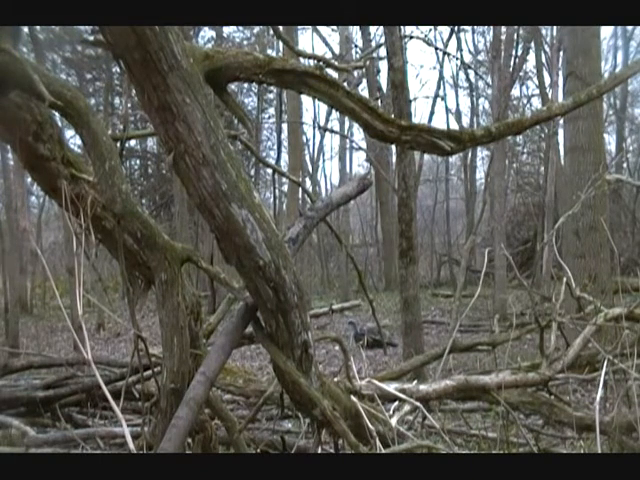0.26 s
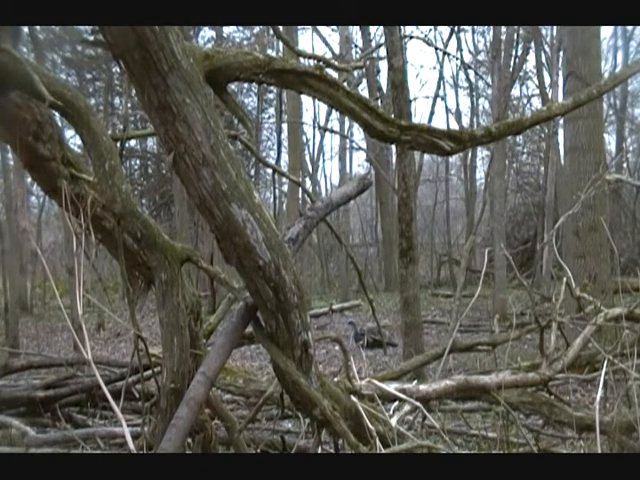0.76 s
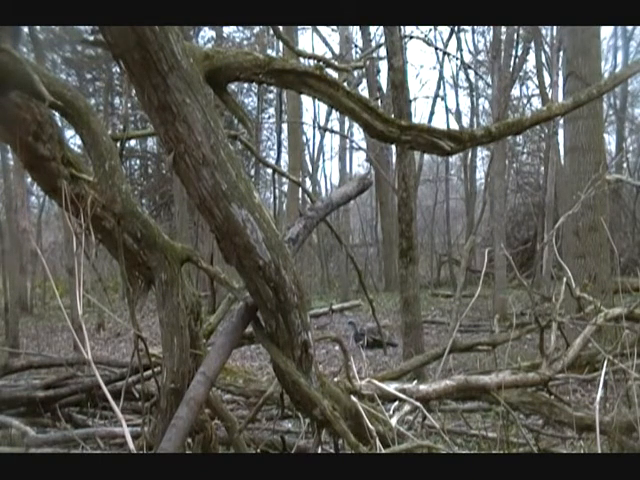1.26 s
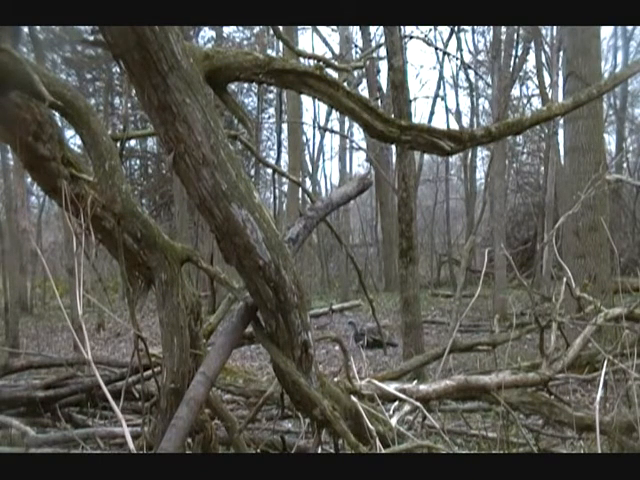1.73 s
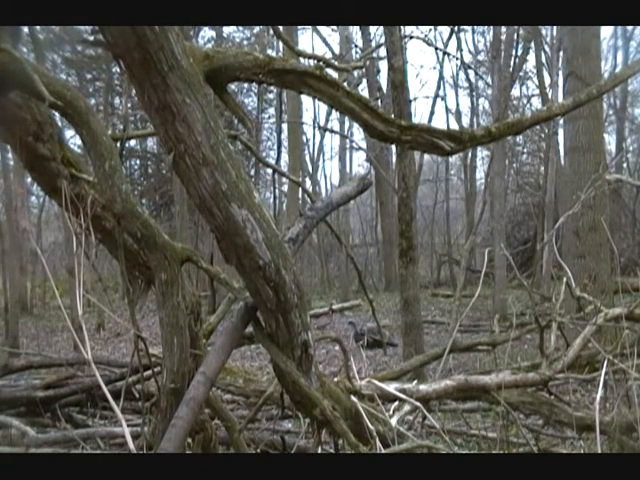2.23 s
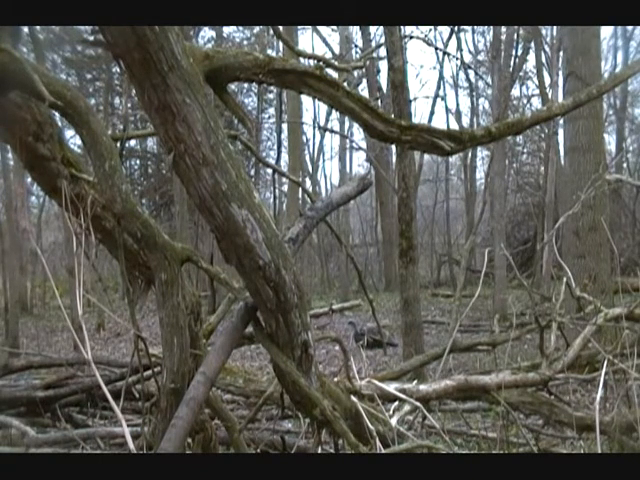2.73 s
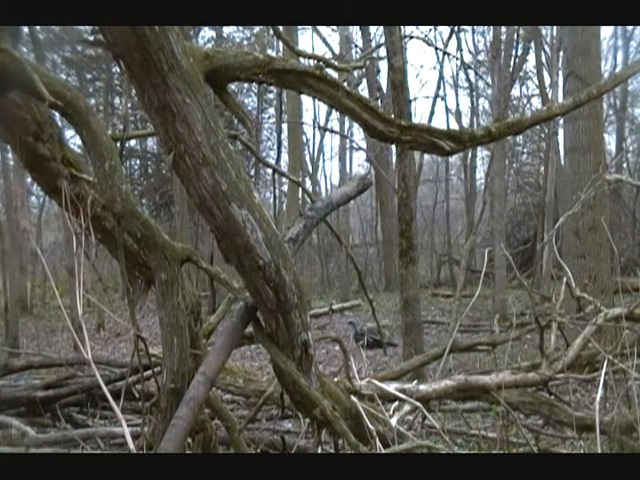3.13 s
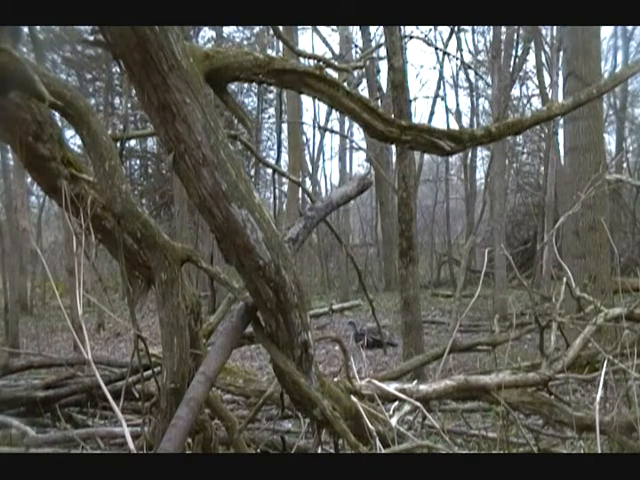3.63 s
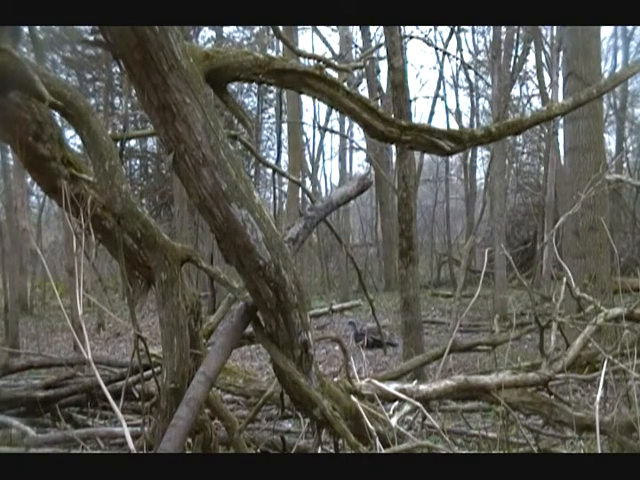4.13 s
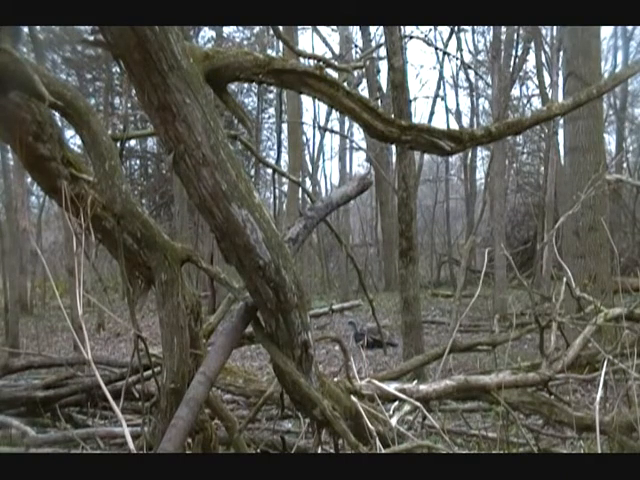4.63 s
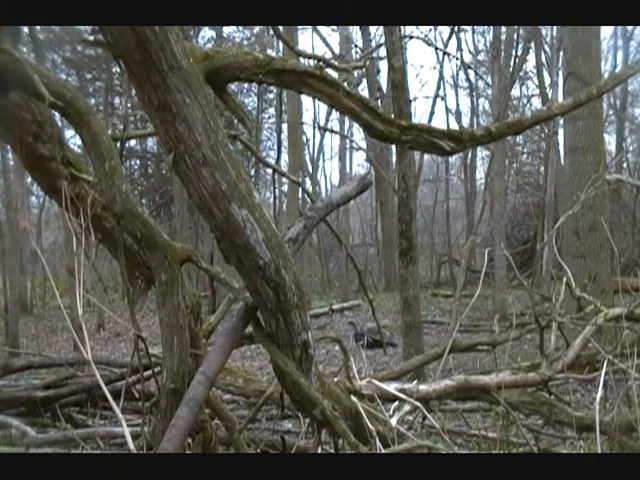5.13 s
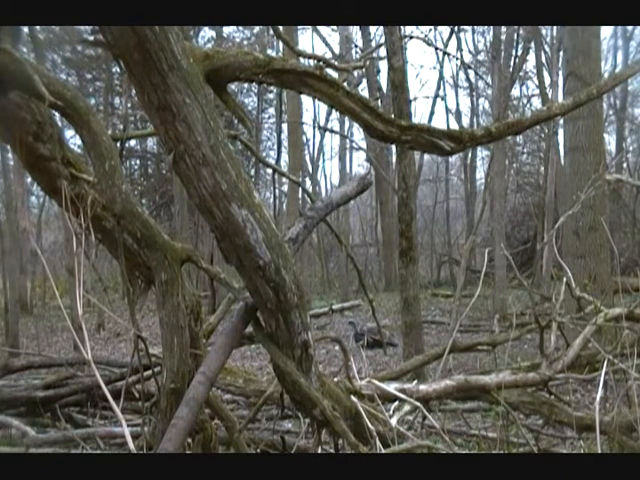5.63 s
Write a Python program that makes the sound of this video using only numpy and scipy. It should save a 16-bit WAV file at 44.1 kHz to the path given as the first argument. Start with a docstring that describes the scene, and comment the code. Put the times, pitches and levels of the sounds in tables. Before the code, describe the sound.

Wild turkeys cluck a few metres from the microphone in bare woods, in short, sharp single and double notes spaced irregularly. After nearly four seconds the clucks give way to soft murmuring pips and a faint crackle of dry leaves. Songbirds further off twitter, chip and whistle in falling glides, and a brief harsh squawk comes near the end. Distant engines drone under a steady low rumble and light hiss.

```python
"""Wild turkeys cluck a few metres away in bare spring woods, pulses from the syrinx resonating in throat
and beak; between clucks they murmur softly and leaves crackle underfoot. Further off, songbirds twitter,
chip and whistle in gliding tones, and a harsh voice squawks. Twigs and trunks scatter the calls into
reverberation. Distant engines drone at their firing tones under a steady rumble and the hiss of the air."""
import sys
import numpy as np
from scipy import signal
from scipy.fft import rfft, irfft
from scipy.io import wavfile
from scipy.ndimage import map_coordinates

SR = 44100
rng = np.random.default_rng(int(sys.argv[2]) if len(sys.argv) > 2 else 0)


def wav_out(sig):
    """Save sig, one row per channel (or a flat mono array), as 16-bit PCM at SR to the path in sys.argv[1]."""
    wavfile.write(sys.argv[1], SR, np.round(np.clip(np.atleast_2d(sig).T, -1, 1) * 32767).astype(np.int16))


N = 258867
TIME = np.arange(N) / SR


def clucks(attack_s=0.0076, release_s=0.0083, drop_s=0.01292, sag_db_per_s=126, jitter=0.037):
    """Source and filter: throat and beak shape the syrinx pulses; a second voice rings beside them."""
    # clucks: t/s, duration/s, f/Hz, relative level/dB, overtones re fundamental/dB
    calls = [(.004, 0.024, 1042, -34.5, -3.5), (0.089, 0.019, 1024, -33, -5.5),
             (.508, 0.023, 978, -26.5, 1), (.666, 0.024, 1008, -25.5, -1), (1.082, .02, 1130, -30, -0.5),
             (1.113, 0.016, 1056, -35.5, -4), (1.202, .021, 984, -30.5, -2.5),
             (1.214, 0.035, 915.3, -26.5, 1), (1.765, 0.02, 1160, -38.5, -10),
             (1.791, 0.026, 1052, -25.5, 0.5), (2.388, .024, 1058, -24, 1), (2.443, 0.023, 1006, -21, 1.5),
             (3.073, .031, 1112, -23.5, 2), (3.646, 0.017, 853, -25.5, 2), (3.649, .046, 766, -21.5, -8.5)]
    # response of throat and beak: f/Hz, gain/dB
    throat = [(400, -18.5), (750, -6), (1020, 0.5), (1250, -1.5), (1480, -7.5), (1830, 2), (2120, -0.5),
              (2550, -5.5), (3050, -5.5), (3600, -16), (4800, -19.5), (6100, -27), (7500, -39),
              (10500, -42.5)]
    # the second voice breaking through: t/s, duration/s, relative level/dB
    squeaks = [(1.219, .015, -27), (1.2292, 0.015, -17.5), (1.798, 0.017, -27.5), (3.647, 0.013, -17),
               (3.653, 0.029, -26.5), (3.685, 0.017, -29.5)]
    second_hz, second_db, waver, rasp_db = 1763, -9, 0.011, -19
    pulses, second_voice = np.zeros(N), np.zeros(N)
    for s, length, hz, db, overtones_db in calls:
        t = TIME[:int(length * SR)]
        # a cluck starts sharp, drops onto its pitch and lifts again as it ends
        drop = 0.26 * (1 - t / drop_s).clip(0) ** 2
        lift = 0.16 * (t / length) ** 4.7
        phase = turn(hz * (1 + drop + lift) * (1 + jitter * walk(982, len(t))))
        attack = (t / attack_s).clip(0, 1)
        release = ((length - t) / release_s).clip(0, 1)
        swell = attack * release * undb(-sag_db_per_s * (t - attack_s))
        buzz = sum(np.cos(k * phase) for k in range(2, 11))
        rasp = undb(rasp_db) * 4 * walk(20000, len(t)) * (1 + np.cos(phase))
        # the tone starts pure and gains its overtones once the membranes slap together
        slap = undb(overtones_db) * attack ** 3.6 * release ** 0.13
        add(pulses, s, undb(db) * swell * (np.cos(phase) + slap * buzz + rasp))
        add(second_voice, s, undb(db + second_db) * pip(length, second_hz, waver))
    for s, length, db in squeaks:
        add(second_voice, s, undb(db) * pip(length, second_hz, waver))
    return undb(3) * (colour(pulses, throat) + second_voice)


def murmurs(pip_s=0.021, spacing_s=0.019, hz=1770, uneven_db=2.5):
    """Tone bursts: with the beak shut, only a turkey's second voice sounds, in soft pips."""
    # runs of pips: t/s, duration/s, level/dB
    runs = [(0.386, .02, -46), (4.709, .02, -47.5), (4.831, .02, -47.5), (4.899, .04, -44.5),
            (4.982, .125, -42), (5.434, .02, -48), (5.516, .02, -53)]
    out = np.zeros(N)
    for s, length, db in runs:
        for delay in np.arange(0, length, spacing_s):
            gain = undb(db + uneven_db * rng.standard_normal())
            add(out, s + delay, gain * pip(pip_s, hz, waver=0.043))
    return out


def rustles(crackle_db=6):
    """Amplitude-modulated noise: dry leaves crackle briefly under a foot."""
    # steps in the leaf litter: t/s, duration/s, level/dB
    steps = [(0.912, 0.058, -49), (4.402, 0.125, -47), (4.466, 0.018, -59)]
    # spectrum of dry leaves: f/Hz, gain/dB
    leaves = [(300, -15), (1200, -6), (1600, -4), (2800, -1), (4000, -8.5), (5500, -8.5), (11000, -43)]
    press = np.zeros(N)
    for s, length, db in steps:
        add(press, s, undb(db) * np.hanning(int(length * SR)))
    crackle = rng.standard_normal(N) * undb(crackle_db * walk(500))
    return press * unit(colour(crackle, leaves))


def whistles(waver=0.0045, tremble_db=1.6, gain_db=-2.5):
    """Pure-tone glides: three thin, trembling bird whistles slide slowly down."""
    # one contour for each whistle: t/s, f/Hz, relative level/dB
    contours = [
        [(0.0, 4470, -53), (0.12, 4039.0, -56), (0.26, 3380, -54), (0.5, 2990, -54.4), (0.63, 2661.0, -53.3),
         (0.8, 2410, -58)],
        [(2.34, 3920, -55), (2.42, 4460, -47), (2.56, 4620, -52.5), (2.68, 4065, -48), (2.8, 3830, -57)],
        [(2.82, 3462, -51), (2.92, 3280, -44), (3.02, 3220, -55.5), (3.14, 3023, -42), (3.3, 2764, -49.5),
         (3.5, 2491, -50.5), (3.65, 2253, -60)],
    ]
    out = np.zeros(N)
    for rows in contours:
        hz, db = curve(rows)
        sounding = (TIME >= rows[0][0]) & (TIME < rows[-1][0])
        envelope = sounding * undb(db + gain_db + tremble_db * walk(60))
        out += envelope * np.sin(turn(hz * (1 + waver * walk(150))))
    return out


def chips(length_s=0.018, sweep=0.28, jitter=0.043, gain_db=-2):
    """Frequency sweeps: a nearby bird's upward flicks, made scratchy by pitch jitter."""
    # dry chips: t/s, relative peak level/dB, centre f/Hz
    calls = [(0.5803, -40, 2970), (1.4803, -43, 2790), (4.0056, -34.5, 2980), (4.63, -44.5, 2980),
             (5.1838, -42, 3080)]
    out = np.zeros(N)
    for s, db, hz in calls:
        ramp = np.linspace(-0.5, 0.5, int(length_s * SR))
        pitch = hz * (1 + sweep * ramp + jitter * walk(1580, len(ramp)))
        add(out, s - length_s / 4, undb(db + gain_db) * np.hanning(len(ramp)) * np.sin(turn(pitch)))
    return out


def twitters(lead_s=0.026, lead_db=-2.5, stroke_s=0.023, fade_db_per_s=22):
    """Linear chirps: a songbird's high lead note, then up-down flicks that fade as they repeat."""
    # twitters: t/s, duration/s, flick period/s, level/dB
    phrases = [(0.004, .2, 0.13, -47), (1.863, .34, 0.12, -44.5), (4.093, .14, .08, -44)]
    lead_hz = np.linspace(4230, 4630, int(lead_s * SR))
    up_hz = np.linspace(2800, 3368, int(stroke_s * SR))
    down_hz = np.linspace(3368, 2320, int(stroke_s * SR))
    out = np.zeros(N)
    for s, length, period, db in phrases:
        add(out, s, undb(db + lead_db) * note(lead_hz, hoarse=0.2))
        for delay in np.arange(0, length, period):
            flick = np.concatenate([note(up_hz, hoarse=0.45), note(down_hz, hoarse=0.45)])
            add(out, s + lead_s + delay, undb(db - fade_db_per_s * delay) * flick)
    return out


def songbirds(rise_octaves_per_s=1.01, settle_s=0.024, fade_db_per_s=14, hoarse=0.13):
    """Exponential glides: high notes climb at one rate; slurs settle onto a pitch and fade."""
    # rising notes: t/s, duration/s, middle f/Hz, level/dB
    rising_notes = [(0.137, 0.018, 4850, -48.5), (1.525, 0.13, 6600, -58.5), (3.206, 0.14, 6320, -45),
                    (3.322, .025, 7720, -41.5), (3.337, 0.038, 8220, -38), (3.377, 0.021, 8930, -41.5),
                    (5.636, 0.065, 8600, -47), (5.768, 0.046, 6240, -47), (5.843, 0.035, 8450, -47)]
    # falling slurs: t/s, duration/s, landing f/Hz, level/dB
    slurs = [(4.68, .1, 4270, -58), (4.713, 0.12, 5245, -49), (4.832, 0.042, 3980, -45),
             (4.871, 0.28, 3216, -45.5), (5.275, 0.091, 5780, -56.5), (5.371, 0.044, 5000, -56)]
    out = np.zeros(N)
    for s, length, hz, db in rising_notes:
        t = TIME[:int(length * SR)]
        pitch = hz * 2 ** (rise_octaves_per_s * (t - length / 2))
        add(out, s, undb(db) * note(pitch, hoarse))
    for s, length, hz, db in slurs:
        t = TIME[:int(length * SR)]
        pitch = hz * (1 + 0.145 * np.exp(-t / settle_s))
        add(out, s, undb(db - fade_db_per_s * t) * note(pitch, hoarse))
    return out


def squawk(rattle_hz=48, jitter=0.1314):
    """Spectral broadening: a rising, rattling voice is so unsteady that its harmonics smear."""
    # course of the far-off call: t/s, f/Hz, level/dB
    contour = [(5.57, 1050, -65.5), (5.595, 1079, -46.5), (5.612, 1112, -40.5), (5.65, 1239, -45),
               (5.675, 1274, -54), (5.72, 1270, -74)]
    # timbre of the voice: f/Hz, gain/dB
    timbre = [(400, -34), (1200, -16), (1600, 2), (2200, 1), (2600, 1.5), (3100, -15), (3800, -17),
              (5500, -18), (10000, -42)]
    hz, db = curve(contour)
    phase = turn(hz * (1 + jitter * walk(1600)))
    harmonics = sum(np.cos(k * phase) for k in range(1, 6))
    rattle = 1 + 0.5 * np.sin(turn(rattle_hz * (1 + 0.15 * walk(30))))
    sounding = (TIME > contour[0][0]) & (TIME < contour[-1][0])
    return unit(colour(harmonics, timbre)) * rattle * undb(db) * sounding


def engines(fast_hz=77.3, slow_hz=68.6, overtone_hz=155):
    """Beating of two distant engines: only the lowest firing tones carry; the air makes them waver."""
    # the faster engine: t/s, relative level/dB
    fast_levels = [(0, -43.9), (0.5, -51.1), (0.85, -40.8), (1.72, -48.6), (1.79, -32.9), (2.2, -35.5),
                   (2.33, -52.0), (2.65, -37.1), (2.9, -53.4), (3.15, -43.6), (4.2, -40.0), (4.8, -42.9),
                   (5.4, -40.3), (5.87, -48.3)]
    # the slower engine: t/s, level/dB
    slow_levels = [(0, -44), (.4, -56), (3.6, -54), (4.2, -46), (4.8, -40), (5.4, -42), (5.87, -53)]
    fast_db, = curve(fast_levels)
    slow_db, = curve(slow_levels)
    fast = undb(fast_db + 1 + 2 * walk(15)) * np.sin(turn(fast_hz + 1.11 * walk(2.063)))
    slow = undb(slow_db + walk(12)) * np.sin(turn(slow_hz + walk(2.1)))
    overtone = undb(-53 + 2 * walk(3.5)) * np.sin(turn(overtone_hz + walk(3)))
    return fast + slow + overtone


def air(level_db=-39, swell_db=0.06, flicker_db=0.5):
    """Partly coherent noise: far rumble and hiss in octave bands that swell together and flicker alone."""
    # background spectrum: f/Hz, relative spectral density/dB
    spectrum = [(18, -12.5), (28, -11.2), (45, -3.7), (65, 0.0), (125, -4.0), (190, -11.7), (300, -18.0),
                (560, -21.3), (900, -24.8), (1800, -29.3), (2900, -32.7), (4200, -36.0), (6500, -38.4),
                (11000, -41.0)]
    # likeness of left and right: f/Hz, correlation (0-1)
    likeness = [(60, 1), (130, 0.98), (270, 0.86), (570, 0.73), (1220, 0.56), (2580, 0.24), (5500, 0.03)]
    hz = np.fft.rfftfreq(N, 1 / SR)
    correlation = np.clip(at(likeness, hz), 0, 1)
    width = np.sqrt((1 - correlation) / (1 + correlation))
    mid, side = rfft(rng.standard_normal((2, N))) * undb(at(spectrum, hz))
    stereo = mid + np.array([[1], [-1]]) * side * width
    octave = np.log2(np.maximum(hz, 32)).astype(int)
    common_db = swell_db * walk(1.5)
    out = np.zeros((2, N))
    for k in np.unique(octave):
        out += irfft(stereo * (octave == k), N) * undb(common_db + flicker_db * walk(6.8))
    return undb(level_db) * unit(out)


def woods(x, left_lag_ms, trunks_db, twigs_db, t60_s=0.99, treble_t60_s=0.43):
    """Multiple scattering: after the direct sound, twigs echo briefly and trunks for longer."""
    hz = np.fft.rfftfreq(N, 1 / SR)
    left = irfft(rfft(x) * np.exp(-2j * np.pi * hz * left_lag_ms / 1000), N)
    t = TIME[:SR]
    shared, own = rng.standard_normal(SR), rng.standard_normal((2, SR))
    diffuse = own + 0.57 * shared
    # the air absorbs the treble along the longer paths
    low = signal.sosfiltfilt(signal.butter(2, 5500, fs=SR, output="sos"), diffuse)
    tail = low * undb(-60 * t / t60_s) + (diffuse - low) * undb(-60 * t / treble_t60_s)
    trunks = unit(tail * (1 - np.exp(-t / 0.019)))
    twigs = unit((own + shared)[:, ::-1] * np.exp(-t / 0.012) * (1 - np.exp(-t / 0.00052)))
    echoes = (undb(trunks_db) * trunks + undb(twigs_db) * twigs) / np.sqrt(SR)
    return np.array([left, x]) + signal.fftconvolve(x[None], echoes, axes=1)[:, :N]


def pip(length_s, hz, waver):
    """Tone burst: one smooth swell of a wavering sine."""
    swell = np.hanning(int(length_s * SR))
    return swell * np.sin(turn(hz * (1 + waver * walk(340, len(swell)))))


def note(hz, hoarse, flutter_db=1.6):
    """Random modulation: a songbird's note flutters in level and, if hoarse (0-1), shakes in pitch."""
    size = len(hz)
    shake = (0.0035 + 0.16 * hoarse ** 2) * walk(893, size)
    swell = np.sqrt(np.sin(np.linspace(0, np.pi, size)).clip(0))
    return undb(flutter_db * walk(135, size)) * swell * np.sin(turn(hz * (1 + shake)))


def colour(x, points):
    """Minimum-phase filtering with the response given as f/Hz, gain/dB."""
    size = 2048
    gain = undb(at(points, np.fft.rfftfreq(size, 1 / SR)))
    cepstrum = irfft(np.log(gain))
    cepstrum[1:size // 2] *= 2
    cepstrum[size // 2 + 1:] = 0
    return signal.fftconvolve(x, irfft(np.exp(rfft(cepstrum))))[:N]


def walk(rate, size=N):
    """Smooth random fluctuation with spread near 1, changing rate times a second."""
    source = np.random.default_rng(rng.integers(2 ** 31))
    steps = source.standard_normal(int(size * rate / SR) + 4)
    return map_coordinates(steps, [np.arange(size) * rate / SR + 1], order=2)


def turn(hz):
    """Phase as the time integral of frequency."""
    return 2 * np.pi * np.cumsum(hz) / SR


def curve(rows):
    """Linear interpolation in time of each column of a table."""
    s, *columns = np.transpose(rows)
    return [np.interp(TIME, s, column) for column in columns]


def at(points, hz):
    """Interpolation of (f/Hz, value) points on a log-frequency axis."""
    f, value = np.transpose(points)
    return np.interp(np.log(np.maximum(hz, 1)), np.log(f), value)


def add(track, s, x):
    """Superposition of a sound on a track at time s."""
    i = max(int(s * SR), 0)
    track[i:i + len(x)] += x[:max(N - i, 0)]


def undb(db):
    """Amplitude ratio from decibels."""
    return 10 ** (np.asarray(db) / 20)


def unit(x):
    """Normalisation to rms 1."""
    return x / np.sqrt(np.mean(x ** 2))


def balance(left_db):
    """Level difference: stereo gains that put the left side left_db above the right."""
    return undb(np.array([[left_db], [-left_db]]) / 2)


def scene():
    """Superposition: turkeys nearby, songbirds deep in the woods, engines beyond."""
    turkeys = woods(clucks(), left_lag_ms=0.11, trunks_db=-29, twigs_db=-14.5) * balance(left_db=1.3)
    flock = woods(murmurs() + rustles(), left_lag_ms=0.075, trunks_db=-7, twigs_db=-4)
    near_birds = woods(whistles() + chips(), left_lag_ms=0.045, trunks_db=-8, twigs_db=-5)
    far_birds = woods(twitters() + songbirds() + squawk(), left_lag_ms=0.051, trunks_db=-2, twigs_db=-2)
    return turkeys + flock + near_birds + far_birds + engines() + air()


def record(dry, cutoff_hz=11250):
    """Band limiting: the top treble is cut steeply, and the left side is a little louder."""
    low_pass = signal.firwin(601, cutoff_hz, fs=SR, window=("kaiser", 8))
    return signal.fftconvolve(dry * balance(left_db=1.9), low_pass[None], mode="same", axes=1)


dry = scene()
out = record(dry)
wav_out(out)
```